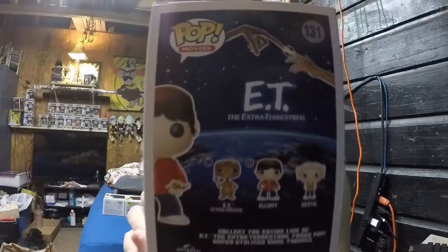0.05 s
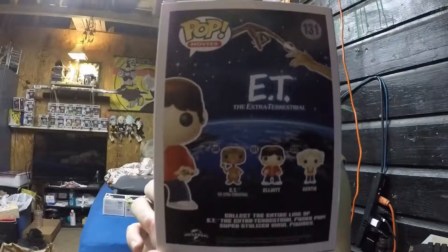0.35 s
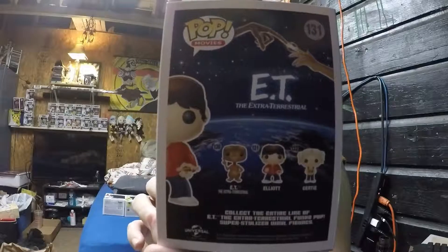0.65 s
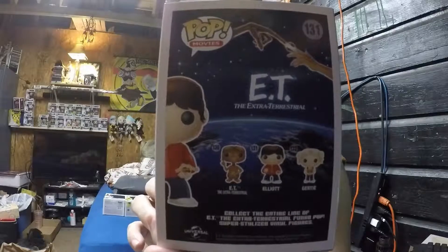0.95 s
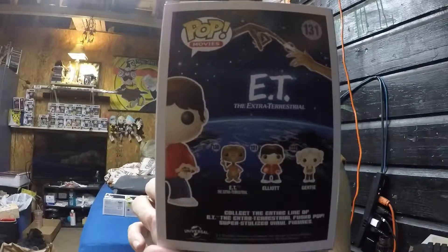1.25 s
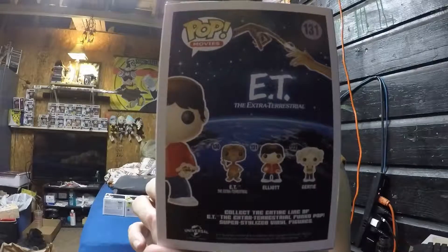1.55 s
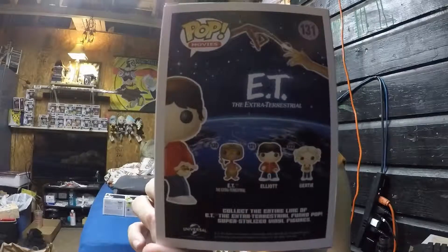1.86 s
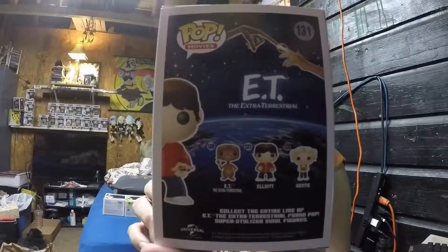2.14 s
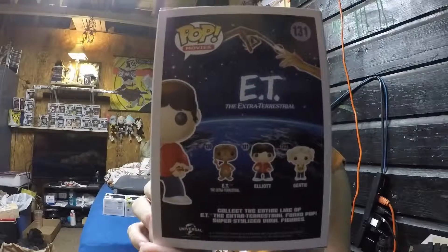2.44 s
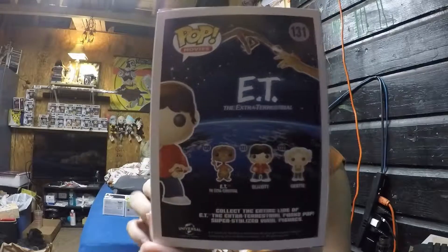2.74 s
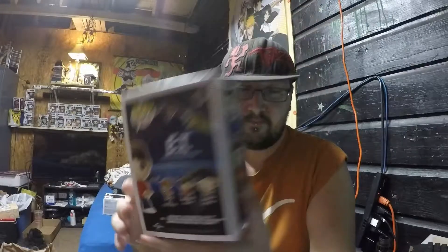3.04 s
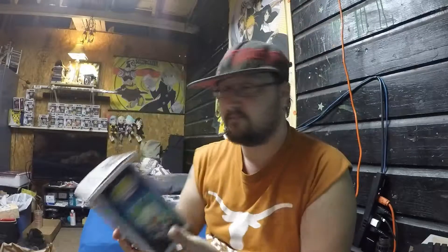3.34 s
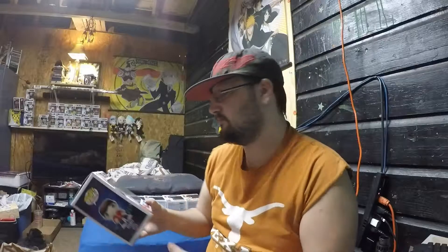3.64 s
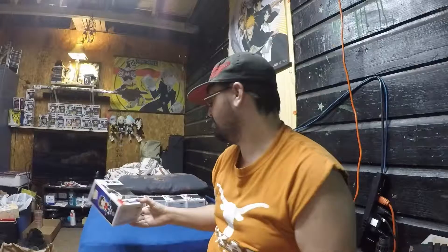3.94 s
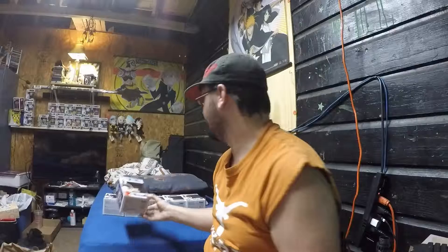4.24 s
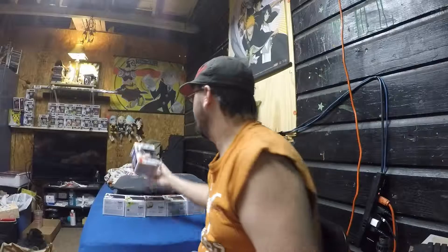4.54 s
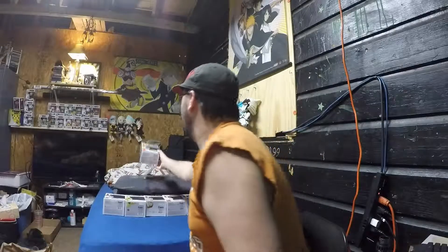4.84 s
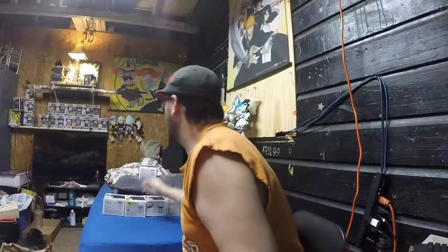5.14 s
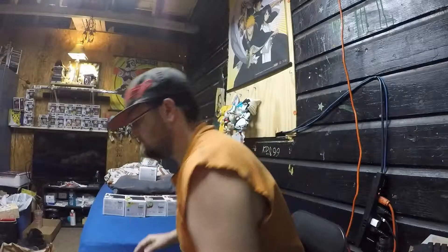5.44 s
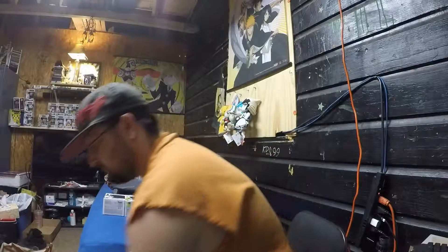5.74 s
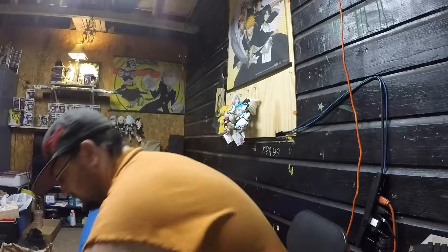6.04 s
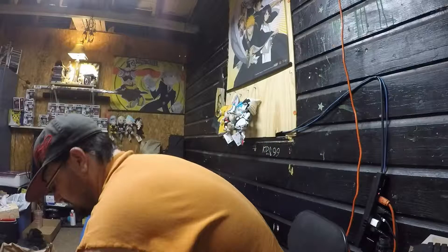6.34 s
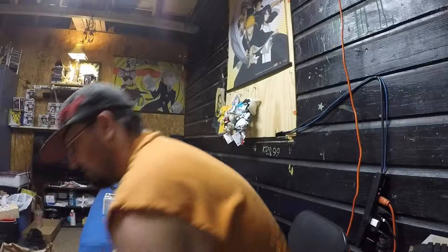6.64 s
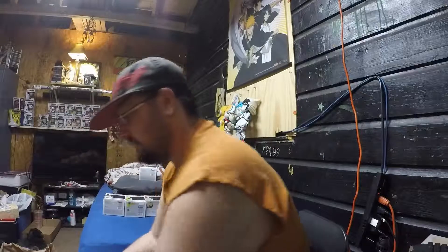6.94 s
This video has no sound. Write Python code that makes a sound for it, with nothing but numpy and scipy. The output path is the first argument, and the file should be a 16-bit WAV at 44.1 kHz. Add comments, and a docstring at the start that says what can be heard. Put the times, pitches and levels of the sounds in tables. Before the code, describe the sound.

A low mechanical hum and the even rush of a fan fill a small room, with a very faint high whine from the microphone's electronics. About three seconds in, a cardboard box slides through fingers and is lightly tapped. Two seconds later it is set down with a soft, hollow knock and a scuff. Near the end, packaging rustles and crinkles briefly, with small ticks and squeaks.

```python
"""Mains-driven machines and a fan hum in a small wood-panelled room; a stereo camera adds a faint,
pulsing whine. A cardboard box slides through the fingers, is tapped and set on a pile: its damped
walls knock and the card scuffs, then cloth swishes faintly. A hand reaches into packaging, which
catches and slips in a rustle of tiny creases, with a few ticks and stick-slip squeaks."""
import sys
import numpy as np
from scipy.fft import rfft, irfft, next_fast_len
from scipy.io import wavfile
from scipy.ndimage import map_coordinates

SR = 44100
rng = np.random.default_rng(int(sys.argv[2]) if len(sys.argv) > 2 else 0)


def inscribe(sig):
    """Save sig as 16-bit PCM at rate SR to the path in sys.argv[1].

    A 1-D sig is mono; a 2-D sig holds one channel per row.
    Samples are clipped to [-1, 1] before scaling.
    """
    pcm = np.round(np.clip(np.atleast_2d(sig).T, -1, 1) * 32767)
    wavfile.write(sys.argv[1], SR, pcm.astype(np.int16))


N = 312669

# left-right likeness of packaging noise: freq_hz, correlation
PACKAGING_CORRELATION = [(60, 0.88), (130, 0.92), (290, 1), (630, 0.63), (1370, 0.16), (2990, 0.67),
                         (6540, 0.03), (14300, -0.16)]


def box_and_cloth():
    """Fingers slide over the box; its damped walls knock and scuff, then a faint swish of cloth."""
    # hiss of the slide: centre_hz, width_hz, relative_db
    slide_bands = [(5000, 1100, -21), (5820, 480, -6)]
    # box knocks and scuffs, last row the cloth swish:
    # start_s, tone_db, tone_hz, tone_t60_s, noise_db, noise_hz, width_hz, noise_t60_s
    events = [(3.337, -28, 915, .045, -42, 5500, 2700, .035), (3.356, -52, 700, .05, -55, 4500, 5000, .3),
              (3.382, -40, 657, .05, -45.5, 4900, 2400, .08),
              (5.037, -37, 680, .05, -46.5, 3600, 6000, .07), (5.046, -29, 650, .07, -45, 5000, 3000, .11),
              (5.05, -42, 1250, .04, -45, 2000, 1800, .09), (5.063, -25, 470, .05, -51, 4900, 3500, .09),
              (5.345, -56, 700, .05, -56, 4600, 4000, .42)]
    # modes of the tone: pitch_ratio, relative_db
    modes = [(.48, 4), (1, -4), (1.22, -9.5), (1.8, -12.5), (3.3, -20.5)]
    t = np.arange(N) / SR
    slide_s = np.cumsum([2.95, .05, .085, .03])  # start, attack, hold, release
    out = amp(-50.3) * np.interp(t, slide_s, [0, 1, 1, 0]) * band_noise(slide_bands)
    for start_s, tone_db, tone_hz, tone_t60_s, noise_db, noise_hz, width_hz, noise_t60_s in events:
        age_s = np.maximum(t - start_s, 0)
        onset = 1 - np.exp(-age_s / .0015)
        partials = sum(amp(db) * np.sin(2 * np.pi * (ratio * tone_hz * age_s + rng.random()))
                       for ratio, db in modes)
        tone = amp(tone_db - 60 * age_s / tone_t60_s) * partials
        noise = amp(noise_db - 60 * age_s / noise_t60_s) * band_noise([(noise_hz, width_hz, 0)])
        out += onset * (tone + noise)
    return out


def packaging():
    """Pushes make the sheet catch and slip: dense rustle, crisp edge, hollow body following the effort."""
    # pushes of the hand: peak_s, level_db, swell_s, edge_relative_db
    pushes = [(6.414, -39.5, 0.022, -24.5), (6.532, -31.5, .05, -13.5), (6.582, -34.5, .018, -12),
              (6.652, -34, 0.022, -21), (6.725, -36.5, 0.045, -19), (6.79, -43, .012, -23),
              (6.847, -33.5, 0.019, -22.5), (6.902, -35.5, 0.02, -22), (7.0, -47.5, 0.037, -24.5)]
    # spectra of the three layers: freq_hz, relative_db
    rustle_spectrum = [(400, -33), (1000, -0.5), (1600, 0.5), (2300, -1), (3000, -1), (4500, 1), (6000, 2),
                       (7200, -7), (9000, -20), (14000, -42)]
    edge_spectrum = [(4000, -23), (7500, -0.5), (9500, -5.5), (12500, -9.5), (15000, -22)]
    hollow_spectrum = [(150, -16.5), (300, -5), (580, -1), (760, -4), (1100, -7), (1800, -33.5)]
    strokes = np.array([stroke(peak_s, db, swell_s) for peak_s, db, swell_s, _ in pushes])
    crispness = amp([[edge_db] for *_, edge_db in pushes])
    effort = np.linalg.norm(strokes, axis=0)
    edge_gain = np.linalg.norm(crispness * strokes, axis=0)
    hollow_gain = amp(-20.5) * effort ** .62  # grows more slowly than the rustle
    catch = amp(.9 * wobble(90))
    creases = crinkles(rate_hz=2400, scatter_db=2.5, power_share=.29)
    rustle = effort * pan(.69) * coloured(creases, rustle_spectrum, PACKAGING_CORRELATION)
    fine_creases = crinkles(rate_hz=5400, scatter_db=3, power_share=.25)
    edge = edge_gain * pan(-2) * coloured(fine_creases, edge_spectrum, PACKAGING_CORRELATION)
    hollow = hollow_gain * pan(-1.7) * coloured(white(), hollow_spectrum, PACKAGING_CORRELATION)
    hollow *= amp(1.9 * wobble(35))
    return room_colour(catch * (rustle + edge + hollow), ripple_db=.7, spacing_hz=89)


def crinkles(rate_hz, scatter_db, power_share):
    """Tiny creases snap at random over the smooth noise of sliding."""
    clicks = (rng.random((2, N)) < rate_hz / SR) * white() * amp(scatter_db * white())
    return np.sqrt(power_share) * unit(clicks) + np.sqrt(1 - power_share) * white()


def snaps(t60_s=.065):
    """Larger creases let go, each with a short tick."""
    # ticks: start_s, level_db
    ticks = [(6.549, -31), (6.655, -32.5), (6.819, -34.5), (6.85, -31.5), (6.892, -34), (6.994, -40)]
    # tick spectrum: freq_hz, relative_db
    spectrum = [(300, -20), (900, -2), (2000, -5), (4500, 0), (6000, -1), (7500, -13), (10000, -22),
                (14000, -35)]
    t = np.arange(N) / SR
    gain = sum(amp(db - 60 * np.abs(t - start_s) / t60_s) * (t >= start_s) for start_s, db in ticks)
    return gain * coloured(white(), spectrum, PACKAGING_CORRELATION)


def squeaks():
    """Rubbed card sticks and slips: rough high squeaks, and low creaks that rise as rubbing speeds up."""
    # stick-slip tones: peak_s, level_db, swell_s, pitch_hz, rise_octaves_per_s, jitter_ratio
    slips = [(3.096, -54.5, .005, 4660, 0, .03), (6.541, -39.5, .014, 455, 2, .13),
             (6.693, -40, .02, 565, .8, .06), (6.855, -37.5, .014, 4280, 0, .11)]
    t, out = np.arange(N) / SR, np.zeros(N)
    for peak_s, db, swell_s, hz, rise, jitter in slips:
        glide = 2 ** (rise * np.clip(t - peak_s, -2 * swell_s, 2 * swell_s))
        pitch_hz = hz * glide * (1 + jitter * wobble(hz / 4))
        out += stroke(peak_s, db, swell_s) * unit(np.sin(2 * np.pi * np.cumsum(pitch_hz) / SR))
    return out


def machines():
    """Mains, shafts and blades hum, close pairs beating; small fans add higher, less steady tones."""
    # hum and fan tones: pitch_hz, relative_db, balance_db, left_lead_rad
    hum_tones = [(29.3, -48.8, -1, -0.1), (48.9, -46.6, -2, -0.1), (57.98, -33.4, 2, 0.0),
                 (59.5, -49.6, 1, 0.1), (94.6, -44.3, 10, 1.1), (95.9, -44.6, 4, -0.2),
                 (102.7, -42.9, 3, 1.8), (116, -48.6, 1, -0.1), (120, -25.4, -1, -0.1),
                 (165.4, -51.0, 1, -0.2), (204.3, -53.5, 0, -0.0), (231.9, -53.0, 0, -0.2),
                 (347.8, -57.3, 6, -0.5), (359.1, -57, -1, -0.3), (360, -49.8, 0, -0.5),
                 (363.3, -53.8, -2, -0.3)]
    fan_tones = [(763.5, -61.5, -3, -2.2), (821, -59, -13, 0.7), (872, -62, -11, 2.1),
                 (923.5, -56.3, -3, -1.8), (927.5, -62.6, 0, -3.0), (1230, -65, -5, 1.6),
                 (1324, -66.0, -4, 2.0), (2380, -77, -2, .8), (4640, -79, 0, .8), (4988, -78, 0, -.8)]
    # slight dip and swell of the hum: time_s, gain_db
    swell = [(0, 0), (2.7, 0), (3.28, -1.8), (3.6, 0), (6.5, 0), (6.7, 1), (7.09, .3)]
    swell_db = np.interp(np.arange(N) / SR, *np.transpose(swell))
    hum = amp(3.6 + swell_db) * motor_tones(hum_tones, drift_s=.00003, drift_rate_hz=1.6)
    fans = amp(1.8) * motor_tones(fan_tones, drift_s=.00008, drift_rate_hz=2)
    return hum + fans


def motor_tones(table, drift_s, drift_rate_hz):
    """Tones whose phase wanders with motor speed; room paths shift them between the two microphones."""
    t, out = np.arange(N) / SR, np.zeros((2, N))
    for hz, db, balance_db, lead_rad in table:
        phase = 2 * np.pi * (hz * (t + drift_s * wobble(drift_rate_hz)) + rng.random())
        out += amp(db) * pan(balance_db) * np.sin(phase + np.array([[lead_rad], [-lead_rad]]) / 2)
    return out


def fan_air():
    """The fan's even rush of air, with a narrow hiss on top."""
    # moving air: freq_hz, relative_db
    spectrum = [(12, -15), (48, 0.5), (70, -4.5), (100, -3), (150, -12), (250, -10), (390, -14), (470, -20),
                (950, -25), (1200, -24.5), (1370, -28), (2200, -35), (2900, -38.5), (3500, -41),
                (7400, -47), (8100, -48), (10000, -48.5), (14000, -65.5)]
    # left-right likeness: freq_hz, correlation
    correlation = [(60, 0.59), (130, 0.63), (290, 0.92), (630, 0.51), (1370, -0.28), (2990, 0.47),
                   (6540, -0.063), (14300, -0.025)]
    # left over right: freq_hz, balance_db
    balance = [(60, -1), (300, -.5), (700, -3), (1300, -3.5), (2400, -3), (4200, -1), (8000, -4.5)]
    # hiss: centre_hz, width_hz, relative_db
    hiss_bands = [(5480, 420, 2.5), (5950, 650, -3)]
    rush = amp(-33) * coloured(white(), spectrum, correlation)
    hiss = amp(-63.5) * band_noise(hiss_bands)
    air = room_colour(rush + hiss, ripple_db=.8, spacing_hz=22)
    return filtered(air, lambda hz: pan(log_interp(balance, hz)))


def camera_whine(pitch_hz=8565, frame_rate_hz=29.97):
    """The electronics sing in a short and a longer burst for every picture frame."""
    t = np.arange(N) / SR
    cycle = t * frame_rate_hz % 1
    bursts = sum(np.exp(-((cycle - centre) / width) ** 2) for centre, width in ((.52, .06), (.775, .1)))
    waver_rad = 1.3 * wobble(45) + .6 * np.array([wobble(45), wobble(45)])
    tone = np.sin(2 * np.pi * pitch_hz * t + waver_rad + np.array([[0], [1.1]]))
    return amp(-70) * pan(-2.2) * unit(bursts * tone)


def room_colour(x, ripple_db, spacing_hz):
    """Standing waves of the small room lift some narrow bands and sink others."""
    ripple = lambda hz: map_coordinates(rng.standard_normal(4096), [hz / spacing_hz], mode="wrap")
    return filtered(x, lambda hz: amp(ripple_db * ripple(hz) * hz / (hz + 200)))


def stroke(peak_s, db, swell_s, release_ratio=1.3):
    """Gain of one rub: swells to a rounded peak, dies away more slowly."""
    age_s = np.arange(N) / SR - peak_s
    distance = np.abs(age_s) / np.where(age_s < 0, swell_s, swell_s * release_ratio)
    return amp(db) / np.cosh(np.minimum(distance, 20))


def coloured(pair, spectrum, correlation):
    """Two unrelated signals to stereo of rms 1 with the given spectrum and correlation."""
    def mid_side_gains(hz):
        angle = np.arccos(np.clip(log_interp(correlation, hz), -1, 1)) / 2
        return amp(log_interp(spectrum, hz)) * [np.cos(angle), np.sin(angle)]
    mid, side = filtered(pair, mid_side_gains)
    return unit(np.array([mid + side, mid - side]))


def band_noise(bands):
    """Stereo noise of rms 1 in resonant bands."""
    def response(hz):
        return sum(amp(db) / (1 + (2 * (hz - centre_hz) / width_hz) ** 2)
                   for centre_hz, width_hz, db in bands)
    return unit(filtered(white(), response))


def filtered(x, response):
    """Filter x by the gain response(hz)."""
    size = next_fast_len(N + SR // 4)
    return irfft(rfft(x, size) * response(np.fft.rfftfreq(size, 1 / SR)), size)[..., :N]


def log_interp(points, hz):
    """Interpolate (freq_hz, value) points on a log frequency axis."""
    freq_hz, values = np.transpose(points)
    return np.interp(np.log(hz + 1), np.log(freq_hz + 1), values)


def wobble(rate_hz):
    """Smooth random curve, rate_hz knots a second."""
    knots = rng.standard_normal(int(N * rate_hz / SR) + 4)
    return map_coordinates(knots, [np.arange(N) * rate_hz / SR])


def pan(balance_db):
    """Constant-power stereo gains; positive is left."""
    gains = amp(np.array([[1], [-1]]) * balance_db / 2)
    return gains / np.sqrt(np.mean(gains ** 2, axis=0))


def white():
    """Two unrelated white noises."""
    return rng.standard_normal((2, N))


def amp(db):
    """Decibels to gain."""
    return 10 ** (np.asarray(db) / 20)


def unit(x):
    """Scale to rms 1."""
    return x / np.sqrt(np.mean(x ** 2) + 1e-20)


def scene():
    """The steady room and the handling in it."""
    return machines() + fan_air() + camera_whine() + box_and_cloth() + squeaks() + packaging() + snaps()


def record(dry):
    """The camera's band limit; the ends fade without a click."""
    top_hz, fade_s = 14900, .004
    t = np.arange(N) / SR
    ramp = np.clip(np.minimum(t, t[-1] - t) / fade_s, 0, 1)
    fade = np.sin(np.pi / 2 * ramp) ** 2
    return filtered(dry * fade, lambda hz: hz < top_hz)


dry = scene()
out = record(dry)
inscribe(out)
```